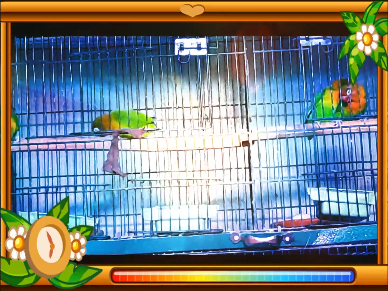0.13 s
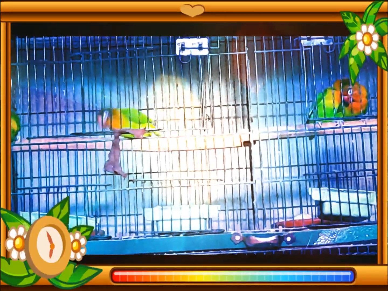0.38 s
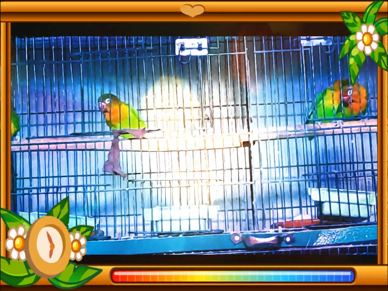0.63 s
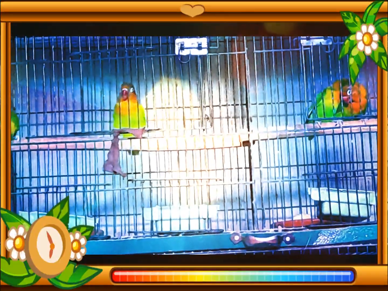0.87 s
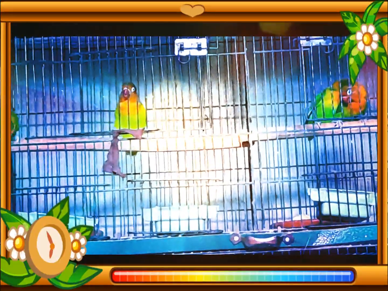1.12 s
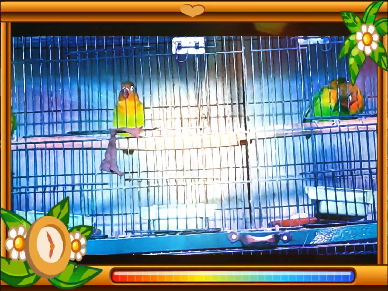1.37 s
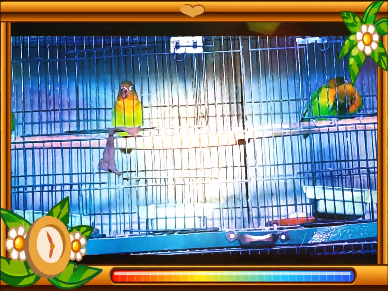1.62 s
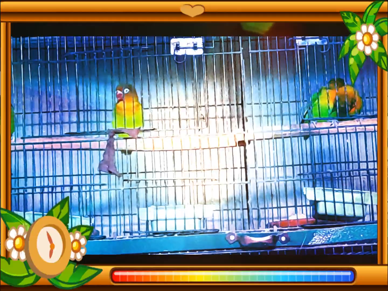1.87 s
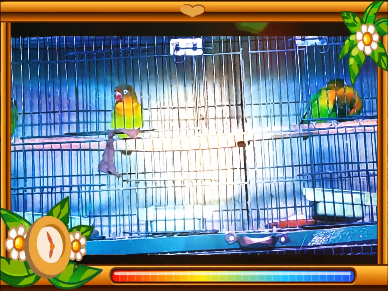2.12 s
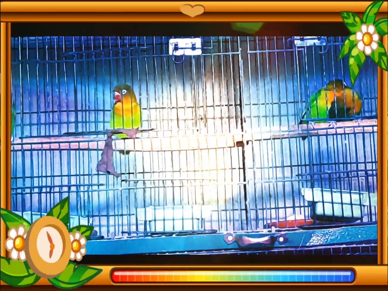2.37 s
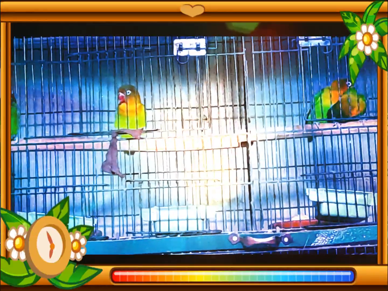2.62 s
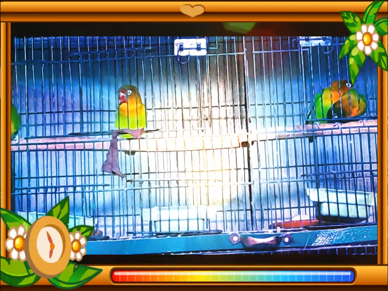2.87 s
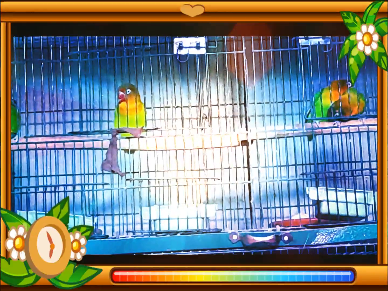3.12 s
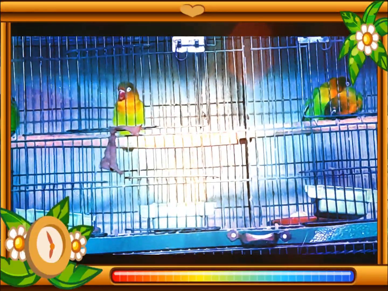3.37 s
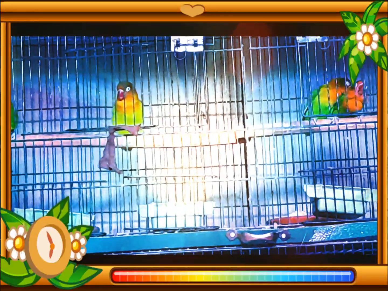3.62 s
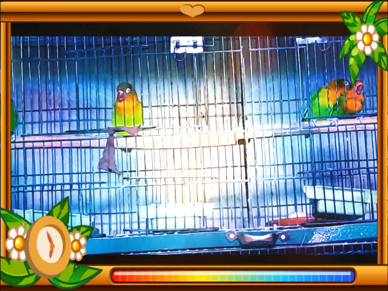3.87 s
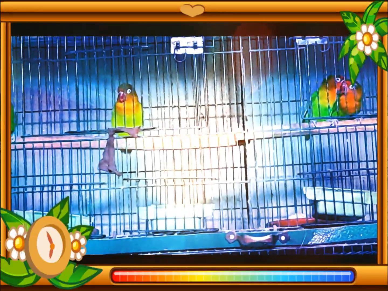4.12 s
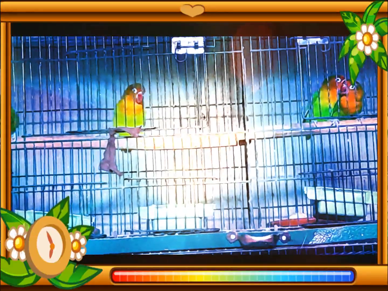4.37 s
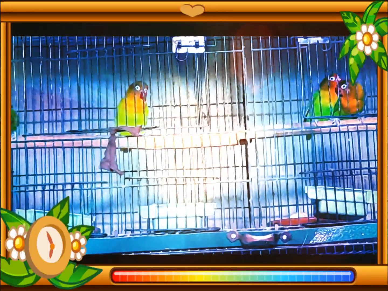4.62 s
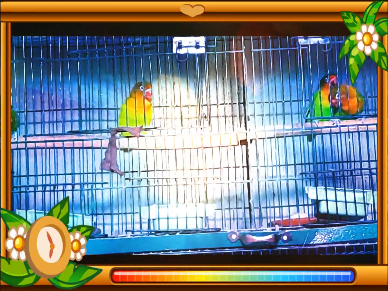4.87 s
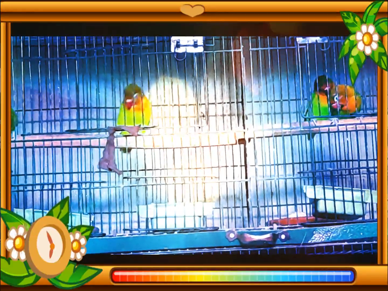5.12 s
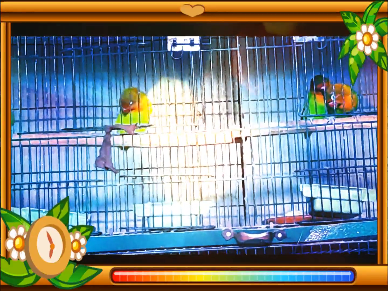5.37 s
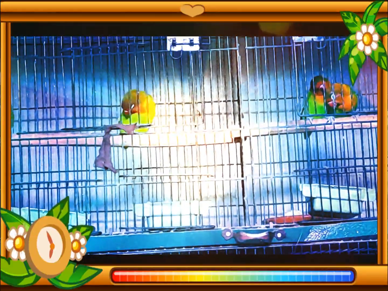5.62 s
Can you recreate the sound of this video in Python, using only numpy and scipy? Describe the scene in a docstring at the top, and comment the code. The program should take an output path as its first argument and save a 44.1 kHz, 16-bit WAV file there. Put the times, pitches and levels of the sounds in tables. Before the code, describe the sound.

Two piercing parrot chirps and a harsh squawk ring out in a small hard room, with faint twitters, hoots and tiny cage clicks over low rumble.

```python
"""Small parrots in a wire cage, heard by two microphones in a small hard room, the right one facing the cage.
A scratch opens, then a shrill near chirp of cracking harmonics; birds further off twitter in gliding tones.
A faint dove-like hoot follows, a wavering sine, then a rough near squawk and later a softer croak.
A lower, louder hoot drifts in before a second chirp, and a last faint hoot comes near the end.
Claws and beaks rattle as bursts of clicks throughout, over shaped noise for the house's low rumble and hiss."""
import sys
import numpy as np
from scipy import signal
from scipy.fft import rfft, irfft
from scipy.io import wavfile
from scipy.ndimage import uniform_filter1d

SR = 44100
rng = np.random.default_rng(int(sys.argv[2]) if len(sys.argv) > 2 else 0)


def natural_amplitude(level_db):
    """Convert a level in decibels to a linear amplitude factor, elementwise."""
    exponent = np.asarray(level_db, float) / 20
    return 10 ** exponent


def wrap_up_sound(samples):
    """Save the sound to the file named by the first command line argument, as 16-bit audio."""
    columns = np.atleast_2d(samples).T
    # keep every value between -1 and 1, then stretch to whole-number steps
    tamed = np.clip(columns, -1, 1)
    steps = np.round(tamed * 32767).astype(np.int16)
    wavfile.write(sys.argv[1], SR, steps)


N = 253575
TIME = np.arange(N) / SR  # s

# Harmonics 1, 2, .. of each voice, relative to one another: level/dB
CHIRP_DB = [-17, 0, -30, -16, -16, -39]
WHISTLE_DB = [0.5, -6]
SQUAWK_DB = [-16.5, 2, -13.5, -10, -12, -20.5]
CROAK_DB = [-1.5, 6, -1.5, -12, -10, -13.5]
TWITTER_DB = [8.5, -15.5]
# One near chirp: the clear note, a jump up, a crack
# (t/s from the clear note, f/Hz, level/dB relative to the chirp, roughness/0-1)
CHIRP = [(-.0002, 2090, -8, 0.1), (.006, 2120, -1.5, .05), (.009, 2150, -1.5, 0), (.0105, 2420, -6, 0.4),
         (.014, 2420, -3, .6), (.018, 1814, 3, 0.73)]
# Faint blip ahead of the chirp's note, same columns
LEAD_IN = [(-.011, 1823, -25.5, 0.58), (-.003, 1900, -32, 0.53)]
# Near chirps (t/s of the clear note, level/dB)
CHIRPS = [(.195, -13.5), (4.370, -12.5)]
# Near high whistles, ending a chirp or alone (t/s, length/s, start f/Hz, level/dB)
WHISTLES = [(0.211, 0.022, 6040, -17), (1.232, 0.016, 6090, -42.5), (4.390, 0.0232, 6000, -17.5)]
# Near long squawk and softer croak (t/s, f/Hz, level/dB, roughness/0-1, held at 1 above that)
SQUAWK = [(1.941, 1842, -26, 1), (1.950, 1812, -30, 0.6), (1.954, 2514, -17.5, 0.4),
          (1.975, 2420, -15, 0.36), (1.990, 2348, -14, 0.12), (2.002, 2355, -11.5, 0.03),
          (2.009, 2360, -26.5, 0), (2.017, 2480, -15.5, 0.28), (2.044, 2440, -17, 0.43),
          (2.057, 2384, -18.5, 0.77), (2.063, 2123, -25.5, 0), (2.066, 2117, -10, 0.01),
          (2.069, 2190, -38.5, 0.3), (2.072, 2216, -19, 0.42), (2.076, 2060, -9.5, 1.1)]
CROAK = [(3.147, 2143, -37, 0.33), (3.172, 2131, -31, 0.77), (3.185, 2087, -34.5, 0.69),
         (3.202, 2007, -41, 0.56)]
# Breath noise of a cracked voice, relative spectrum (f/Hz, level/dB)
RASP = [(1800, -26), (3000, 2.5), (4500, -5), (8000, -7), (12500, -9.5), (13800, -51)]
# Twitter of birds further off (t/s, length/s, start f/Hz, end f/Hz, level/dB)
TWITTER = [(0.299, 0.052, 2263, 2063, -46.5), (0.312, 0.034, 2770, 2525, -42),
           (0.362, 0.013, 3157, 4014, -32.5), (0.365, 0.02, 3885, 3590, -37.5),
           (0.473, 0.023, 1923, 2034, -50.5), (0.469, 0.021, 3800, 3900, -38),
           (0.48, 0.024, 3930, 4490, -38), (0.522, 0.0416, 3557, 3326, -43.5),
           (0.568, 0.047, 3340, 5380, -50), (0.548, 0.033, 2490, 1418, -54),
           (0.577, 0.024, 3000, 2620, -44.5), (1.491, 0.04, 2940, 2500, -58.5),
           (1.715, 0.06, 1710, 1570, -64), (3.256, 0.0263, 2657, 3370, -45),
           (3.351, 0.011, 3170, 3240, -69)]
# Claws and beaks on wire and seed (t/s, level/dB, treble share of the power/0-1, fade time/s)
SCRATCHES = [(.002, -39.5, 0.26, 0.014), (0.077, -52.5, 0.96, 0.026), (0.658, -52, 0.68, 0.027),
             (0.839, -50.5, 0, 0.0074), (1.003, -49, 0.5, 0.019), (1.231, -46, 0.05, 0.019),
             (1.491, -53, 0.4, 0.063), (1.673, -52, 0.8, 0.012), (1.785, -48.5, 0.58, 0.064),
             (2.188, -48.5, 0.4, 0.038), (2.288, -51, 0.77, 0.015), (2.535, -55.5, 0.08, 0.026),
             (2.582, -54.5, 0.38, 0.034), (2.783, -52.5, 0.4, 0.035), (3, -56.5, 0.57, 0.0237),
             (3.25, -43.5, 0.5, 0.043), (3.68, -54.5, 0.4, 0.067), (3.726, -38.5, 0.17, 0.036),
             (3.946, -50.5, 0.47, 0.07), (4.186, -52, 1, 0.0074), (4.257, -50, 0.6, 0.1),
             (4.686, -48, 0.96, 0.0075), (4.746, -54.5, 0.84, 0.016), (5.066, -51.5, 0.4, 0.058),
             (5.172, -44.5, 0.89, 0.032), (5.647, -45, 0.45, 0.029)]
# Dull knocks of the perch (t/s, level/dB)
KNOCKS = [(.002, -61.5), (1.462, -57.5), (1.671, -56), (1.946, -52.5), (3.252, -63), (3.727, -59.5),
          (3.945, -60.5), (4.036, -64), (4.26, -60.5), (5.648, -62)]
# Hoots, one curve each (t/s, f/Hz, level/dB before the waver)
HOOTS = [
    [(.72, 472, -58), (.95, 512, -65.5), (1.3, 516.6, -58), (1.55, 483, -63)],
    [(3.74, 285, -42), (3.84, 292.4, -40.5), (3.87, 329, -51), (3.91, 321, -34), (3.943, 322, -53),
     (3.962, 318, -40), (4.0, 332, -64)],
    [(4.95, 455, -62), (5.0, 456, -55), (5.035, 452, -66), (5.11, 420, -50)],
]
# House noise, relative spectrum per Hz (f/Hz, level/dB)
HOUSE = [(28, -33.5), (48, -10.5), (161, 1), (211, -5.5), (311, -3.5), (406, -10.5), (709, -10),
         (1820, -17), (4480, -16), (8830, -23.5), (9970, -17), (13700, -24), (15800, -27)]
# Likeness of the house noise at the two microphones (f/Hz, correlation/0-1)
LIKENESS = [(60, 0.7), (130, 0.99), (290, 0.89), (640, 0.51), (1410, 0.18), (3100, 0), (6820, 0),
            (15000, 0)]
# Relative swell of the house noise at 30 Hz (t/s, level/dB)
RUMBLE = [(0, 8.5), (1.9, 8.5), (2.2, 3.5), (3.3, 3.5), (3.5, 8.5), (4.3, 9), (5.75, 5.5)]
# Decay of the room by 60 dB (f/Hz, time/s)
ROOM_T60 = [(500, 0.65), (2000, 0.32), (4500, 0.27), (8000, 0.27), (14000, 0.18)]
# Colour of the microphone pair (f/Hz, left minus right level/dB)
MIC_TILT = [(200, 0), (380, 3), (700, 0), (2400, -2.5), (4400, -5), (7000, -5.5), (10000, 5.5),
            (15000, 9.5)]


def near_birds():
    """Chirps, whistles, a squawk and a croak from the cage; the right microphone faces it."""
    edge_s, sag_hz_per_s, whistle_rough = .002, 8000, 0.3
    out = syrinx(SQUAWK, SQUAWK_DB, edge_s) + syrinx(CROAK, CROAK_DB, edge_s)
    for s, db in CHIRPS:
        placed = [s, 0, db, 0]
        out += syrinx(np.add(CHIRP, placed), CHIRP_DB, edge_s)
        out += syrinx(np.add(LEAD_IN, placed), CROAK_DB, edge_s)
    for s, length, hz, db in WHISTLES:
        end_hz = hz - sag_hz_per_s * length
        curve = [(s, hz, db, whistle_rough), (s + length, end_hz, db, whistle_rough)]
        out += syrinx(curve, WHISTLE_DB, edge_s)
    return room(out, wet_db=-2.0, gap_s=.009, left_db=-2.0)


def syrinx(curve, harmonics_db, edge_s):
    """Harmonic tone on a curve; half rough it throbs most, then its pitch breaks up and air rasps."""
    s, *columns = np.transpose(curve)
    span = slice(int(s[0] * SR), int(s[-1] * SR))
    t = TIME[span]
    hz, db, rough = (np.interp(t, s, c) for c in columns)
    rough = np.clip(rough, 0, 1)
    broken_hz = hz * (1 + 0.1955 * rough ** 3 * walk(1200., len(t)))
    phase = 2 * np.pi * np.cumsum(broken_hz) / SR
    tone = sum(natural_amplitude(h) * np.sin((k + 1) * phase + k * k) for k, h in enumerate(harmonics_db))
    rasp = colour(rng.standard_normal(len(t)), RASP)
    air = 2.53 * rough ** 4
    # throb at 250 Hz with a wandering phase
    throb = np.sin(2 * np.pi * (250. * t + rng.random()) + 0.73 * walk(225.0, len(t)))
    depth = np.clip(2.5 * rough * (1 - rough), 0, .62)
    voice = (tone + air * rasp / np.std(rasp)) * (1 + depth * throb)
    # roughness leaves the power alone
    voice = voice / np.sqrt((np.var(tone) + air ** 2) * (1 + depth ** 2 / 2))
    edges = np.clip(np.minimum(t - s[0], s[-1] - t) / edge_s, 0, 1)
    out = np.zeros(N)
    out[span] = natural_amplitude(db) * voice * edges
    return out


def scratches():
    """Each scrape or knock is a short rattle of tiny clicks, strongest at first contact."""
    knock_s = 0.062
    # uneven grain sizes make the noise crackle
    grains = rng.standard_normal((3, N)) * natural_amplitude(2.19 * rng.exponential(size=N))
    treble = band(grains[0], 6900, 13000)
    wire = band(grains[1], 3130, 6870)
    perch = band(grains[2], 270, 1200)
    out = perch * sum(natural_amplitude(db) * bite(s, knock_s) for s, db in KNOCKS)
    for s, db, share, length in SCRATCHES:
        share = np.clip(share, 0, 1)
        scrape = np.sqrt(share) * treble + np.sqrt(1 - share) * wire
        out += natural_amplitude(db) * bite(s, length) * scrape
    return room(out, wet_db=5.0, gap_s=0.00098, left_db=1.5)


def bite(s, length):
    """Contact that takes hold over 4 ms, under an exponential fade."""
    t = np.maximum(TIME - s, 0)
    return np.clip(t / .004, 0, 1) * np.exp(-t / max(length, .002))


def far_birds():
    """Almost pure gliding whistles from further off, heard mostly by way of the walls."""
    rough = 0.41
    out = np.zeros(N)
    for s, length, start_hz, end_hz, db in TWITTER:
        curve = [(s, start_hz, db, rough), (s + length, end_hz, db, rough)]
        out += syrinx(curve, TWITTER_DB, edge_s=.003)
    return room(out, wet_db=4.0, gap_s=0.0031, left_db=-2.5)


def hoots():
    """Soft pure tones, alike at both microphones, that waver in level by about 3 dB."""
    out = np.zeros(N)
    for table in HOOTS:
        s, hz, db = np.transpose(table)
        fade = np.clip(np.minimum(TIME - s[0], s[-1] - TIME) / 0.015, 0, 1)
        phase = 2 * np.pi * np.cumsum(np.interp(TIME, s, hz)) / SR
        out += fade * natural_amplitude(np.interp(TIME, s, db)) * np.sin(phase)
    return np.sqrt(2) * out * natural_amplitude(3 * walk(30., N))


def house():
    """Rumble and hiss; octave bands drift alone, the bass is alike at both microphones."""
    house_db = -50  # rms of the pair
    hz = np.fft.rfftfreq(N, 1 / SR)
    like = np.clip(at(LIKENESS, hz), -.9, .99)
    # unequal mid and side powers set the likeness
    mid = irfft(rfft(rng.standard_normal(N)) * np.sqrt(1 + like), N)
    side = irfft(rfft(rng.standard_normal(N)) * np.sqrt(1 - like), N)
    pair = colour(np.array([mid + side, mid - side]), HOUSE)
    spectrum = rfft(pair)
    octave = np.log2(np.maximum(hz, 1) / 30)
    swell_db = np.interp(TIME, *np.transpose(RUMBLE))
    out = np.zeros((2, N))
    for k in range(10):
        octave_band = irfft(spectrum * np.clip(1 - abs(octave - k), 0, 1), N)
        # the swell in dB shrinks to about half in the top octave
        drift_db = 1.0 * walk(31.0, N) + max(1 - k / 18.5, 0) * swell_db
        out += octave_band * natural_amplitude(drift_db)
    return out * natural_amplitude(house_db) / np.std(out)


def room(x, wet_db, gap_s, left_db):
    """Direct sound, then a dense tail that builds after the first wall and dies faster in the treble."""
    t = np.arange(SR // 2) / SR
    tail = np.zeros((2, len(t)))
    for f in 100 * 2 ** np.arange(0, 8.):  # lower edge of each octave, Hz
        noise = band(rng.standard_normal((2, len(t))), f, 2 * f)
        decay = natural_amplitude(-60 * t / at(ROOM_T60, 1.4 * f))
        tail += noise * np.sqrt(4 * f / SR) * decay
    build_up = np.clip(t / gap_s, 0, 1) ** 2
    tail = tail * build_up * natural_amplitude(wet_db) / np.sqrt(SR / 50)
    tail[:, 0] = natural_amplitude(left_db), 1  # direct sound, left and right
    tail[0, :2] = tail[0, 1::-1].copy()  # it reaches the left microphone one sample later
    return signal.fftconvolve(x[None], tail, axes=1)[:, :N]


def at(table, hz):
    """Read a (f/Hz, value) table on a log-frequency axis."""
    f, v = np.transpose(table)
    return np.interp(np.log(np.maximum(hz, 1)), np.log(f), v)


def colour(x, table):
    """Shape a spectrum by a (f/Hz, level/dB) table."""
    size = x.shape[-1]
    return irfft(rfft(x) * natural_amplitude(at(table, np.fft.rfftfreq(size, 1 / SR))), size)


def band(x, lo_hz, hi_hz):
    """Band-pass scaled to unit rms."""
    sos = signal.butter(2, [lo_hz, min(hi_hz, .45 * SR)], "band", fs=SR, output="sos")
    y = signal.sosfilt(sos, x)
    return y / np.std(y)


def walk(rate, size):
    """Smooth random wander of spread 1, averaged twice over 1/rate seconds."""
    k = max(int(SR / rate), 2)
    w = uniform_filter1d(uniform_filter1d(rng.standard_normal(size), k), k)
    return w * np.sqrt(1.5 * k)


def scene():
    """Birds, cage noises and house together."""
    return near_birds() + far_birds() + scratches() + hoots() + house()


def low_pass(x):
    """Removes everything above the highest recorded frequency."""
    return signal.sosfilt(signal.butter(12, 16090, fs=SR, output="sos"), x)


def record(dry):
    """The two microphones differ in colour: right is stronger at 4 kHz, left at the top."""
    hz, db = np.transpose(MIC_TILT)
    left = colour(dry[0], np.c_[hz, db / 2])
    right = colour(dry[1], np.c_[hz, -db / 2])
    x = np.array([left, right])
    x = x / (1 + x ** 6) ** (1 / 6)  # the input stage rounds only the loudest peaks
    top_cut = signal.ellip(8, .2, 60, 16000, fs=SR, output="sos")
    mix = signal.sosfilt(top_cut, x)
    return low_pass(mix)


dry = scene()
out = record(dry)
wrap_up_sound(out)
```